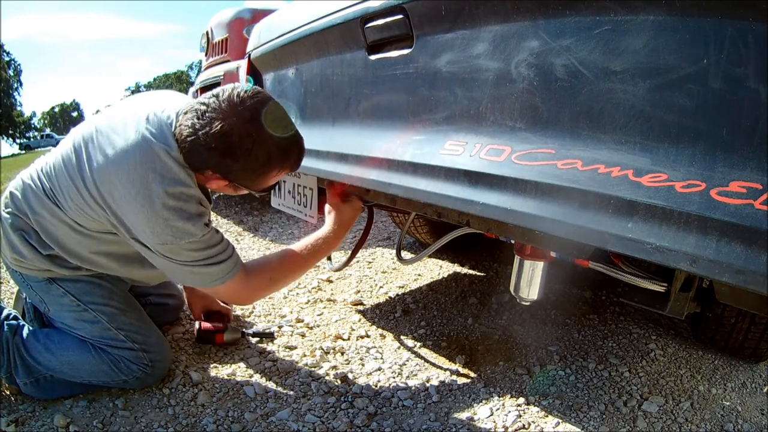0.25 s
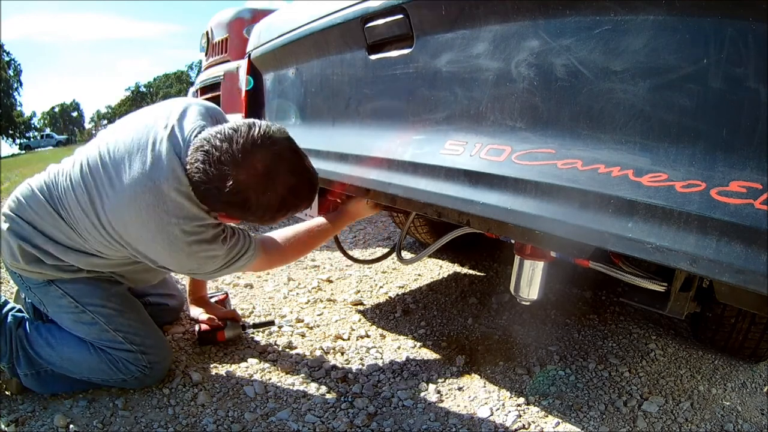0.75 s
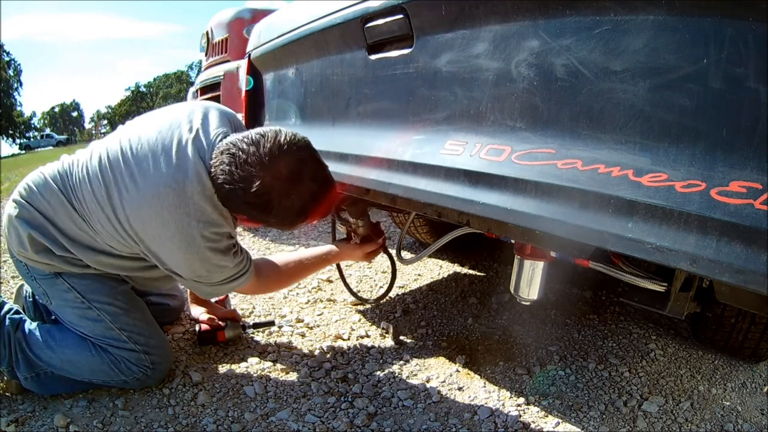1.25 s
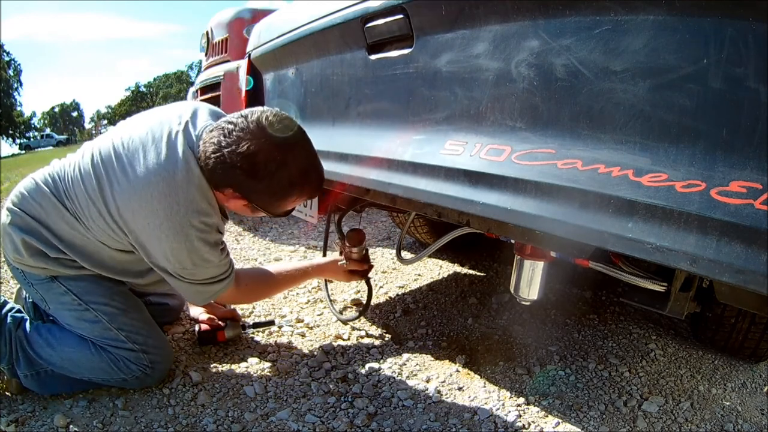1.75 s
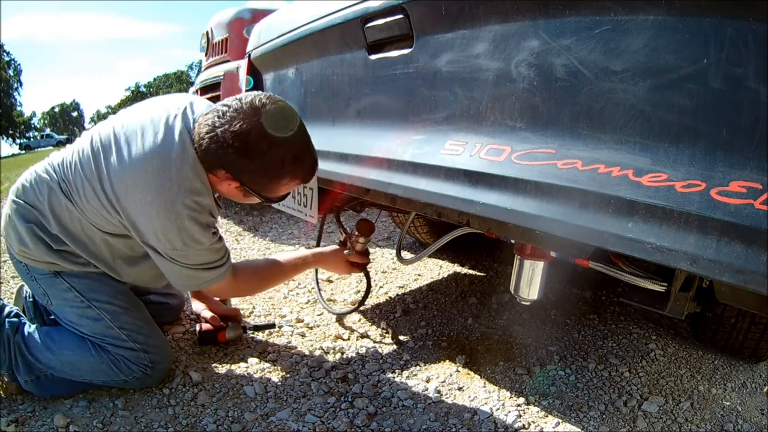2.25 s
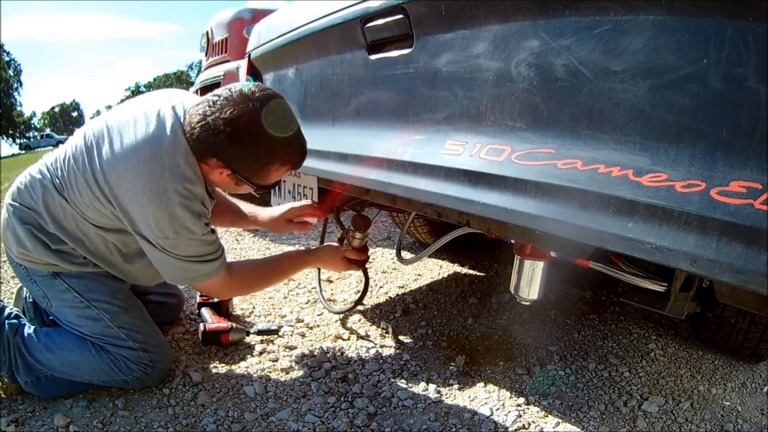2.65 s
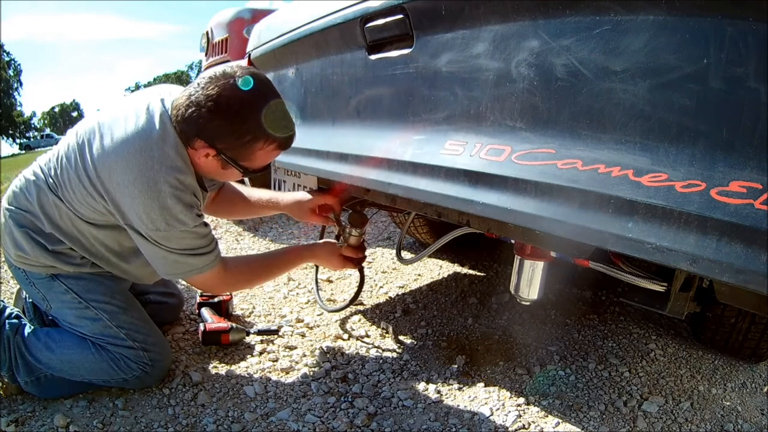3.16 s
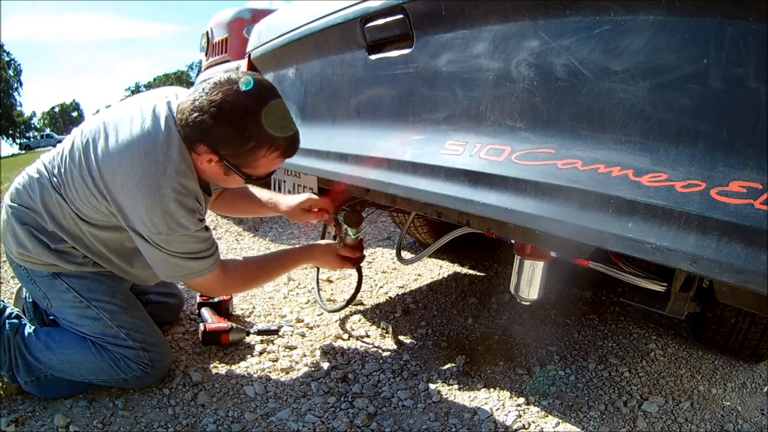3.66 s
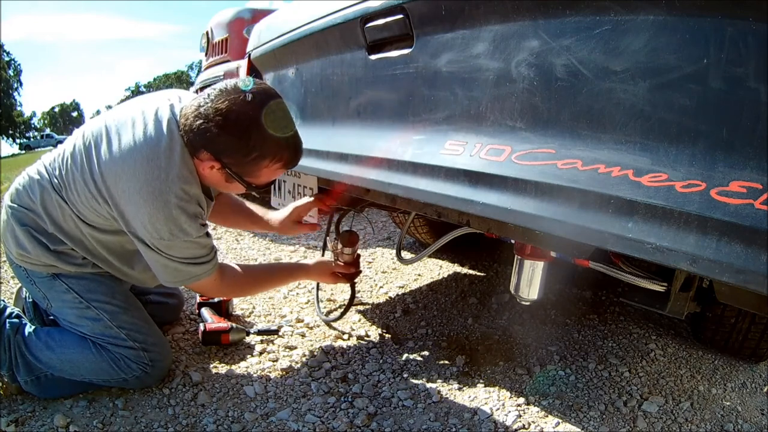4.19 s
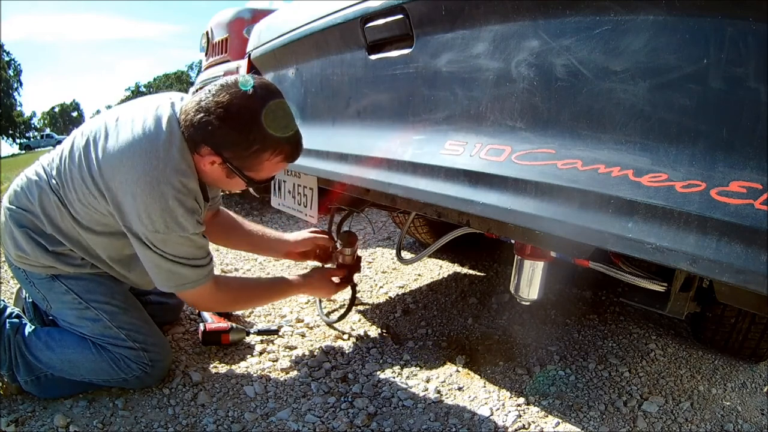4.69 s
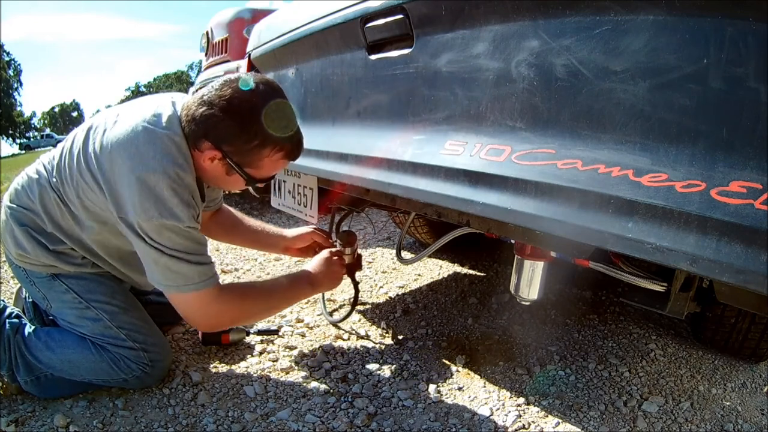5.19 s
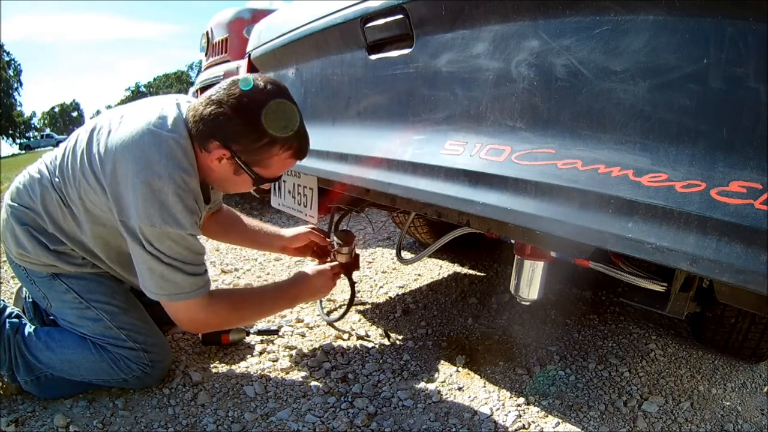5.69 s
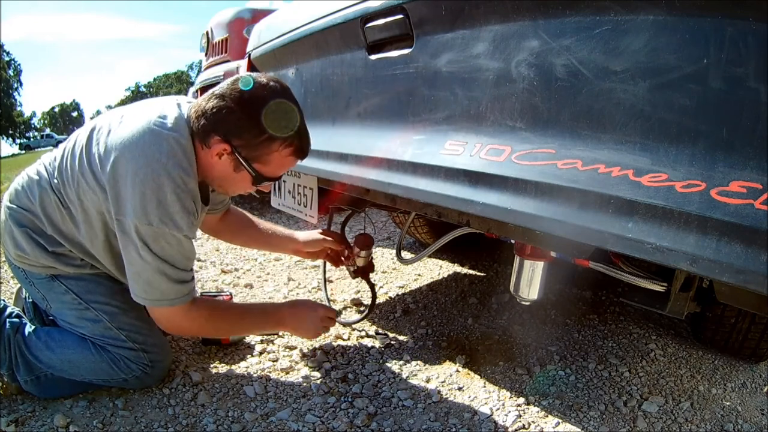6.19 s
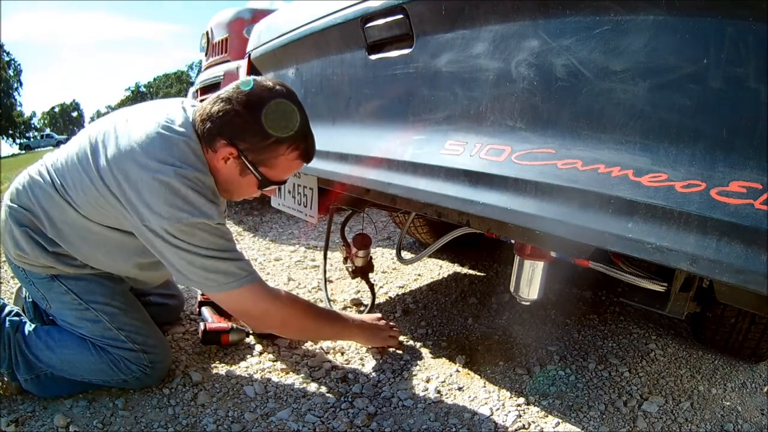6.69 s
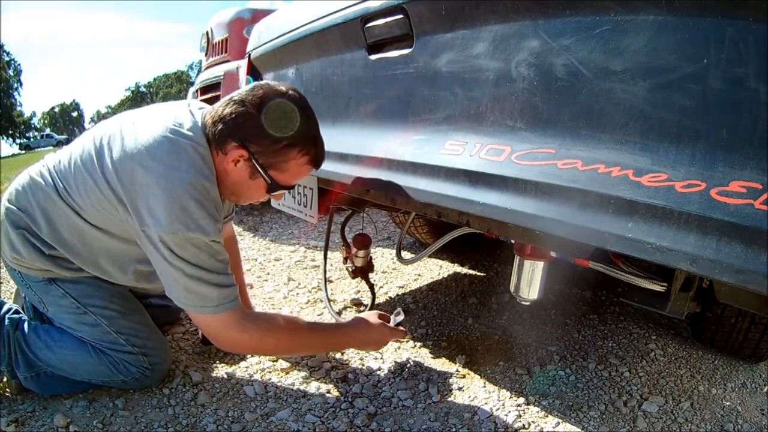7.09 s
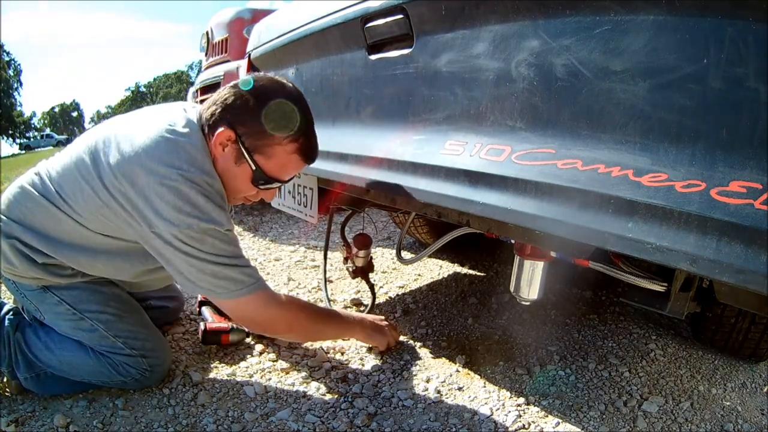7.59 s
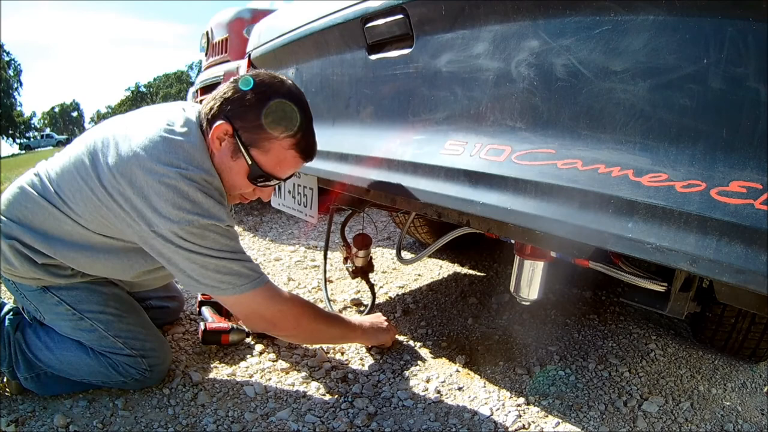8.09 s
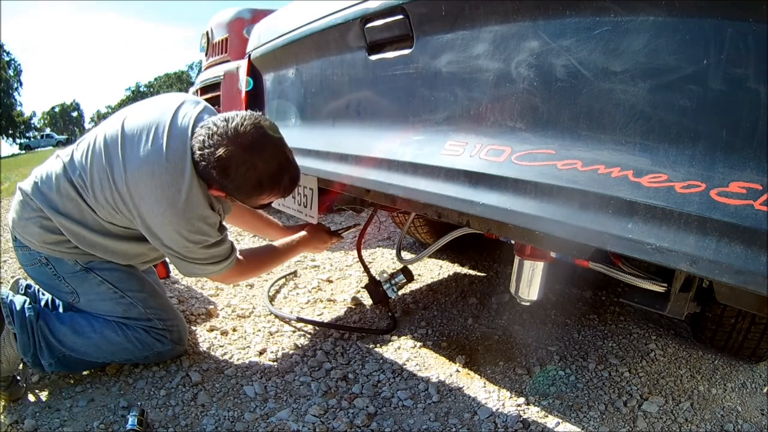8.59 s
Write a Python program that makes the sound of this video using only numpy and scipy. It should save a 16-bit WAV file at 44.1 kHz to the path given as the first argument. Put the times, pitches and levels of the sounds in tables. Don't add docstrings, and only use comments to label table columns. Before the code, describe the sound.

Outdoors by a parked vehicle on gravel, a fan-like machine hums steadily close by with rushing air. Within the first second small metal ticks and a scrape lead to a sharp ringing door slam some way off. Quiet humming follows with sparse tool ticks, then a few dull knocks and a heavy fluttering gust on the muffled microphone. The gust cuts off abruptly near the end, leaving the hum.

```python
import sys
import numpy as np
from scipy import signal
from scipy.fft import rfft, irfft, next_fast_len
from scipy.io import wavfile
from scipy.ndimage import map_coordinates

SR = 44100
rng = np.random.default_rng(int(sys.argv[2]) if len(sys.argv) > 2 else 0)


def invert_db(x):
    u = np.asarray(x, float) / 20
    return 10 ** u


def persist_wave(psi):
    counts = np.round(np.clip(psi, -1, 1) * 32767).astype(np.int16)
    wavfile.write(sys.argv[1], SR, np.atleast_2d(counts).T)


N = 390285


def unit(x):
    return x / np.sqrt(np.mean(x ** 2) + 1e-20)


def along(points, hz):
    f, v = np.transpose(points)
    return np.interp(np.log(hz + 1), np.log(f + 1), v)


def curves(rows):
    s, *columns = np.transpose(rows)
    return [np.interp(np.arange(N) / SR, s, column) for column in columns]


def wobble(rate):
    coarse = np.arange(0, N + 32, 32)
    knots = rng.standard_normal(int(N * rate / SR) + 4)
    return np.interp(np.arange(N), coarse, map_coordinates(knots, [coarse * rate / SR]))


def filtered(x, response):
    m = next_fast_len(len(x) + 8192)
    return irfft(rfft(x, m) * response(np.fft.rfftfreq(m, 1 / SR)), m)[:len(x)]


def noise(spectrum):
    low, high = spectrum[0][0] / 2, spectrum[-1][0] * 2
    ends = [(low, -120)] + list(spectrum) + [(high, -120)]
    return unit(filtered(rng.standard_normal(N), lambda hz: invert_db(along(ends, hz))))


def resonant(peaks):
    def body(f):
        total = 0
        for k, (hz, width, db) in enumerate(peaks):
            damping = 1j * f * width
            total = total + (-1) ** k * invert_db(db) * damping / (hz * hz - f * f + damping)
        return total / (1 + (f / (1.1 * peaks[-1][0])) ** 4)
    return unit(filtered(rng.standard_normal(N), body))


def add(track, s, sound):
    track[round(s * SR):][:len(sound)] += sound


def gate(start, end, rise, fall):
    risen = start + rise
    end = max(end, risen)
    return curves([(start, 0), (risen, 1), (end, 1), (end + fall, 0)])[0]


def stroke(s, length, db, rise, fall, sag_db):
    progress = np.clip((np.arange(N) / SR - s) / length, 0, 2)
    return gate(s, s + length, rise, fall) * invert_db(db - sag_db * progress)


def burst(s, db, hz, t60, octaves, attack_s):
    t = np.arange(SR // 8) / SR

    def band(width):
        bell = lambda f: np.exp(-(np.log2((f + 1) / hz) / width) ** 2 / 2)
        return unit(filtered(rng.standard_normal(len(t)), bell))
    puff = invert_db(-60 * t / t60) * band(octaves)
    snap = invert_db(-0.5 - 60 * t / 0.0066) * band(.55)
    return s, invert_db(db) * (1 - np.exp(-t / attack_s)) * (puff + snap)


# pitch_hz, level_db per Hz
HISS_COLOUR = [(3000, -4), (6500, -3), (7500, -5.5), (12000, -6.5), (13500, -4), (15600, -2)]


def microphone_hiss():
    return invert_db(-80) * noise(HISS_COLOUR)


# time_s, buffet_db
BREEZE_LEVEL = [(0, -62.5), (.2, -49.5), (1.1, -46), (1.85, -46), (2.05, -57.5), (2.3, -41), (3.1, -45.5),
                (3.5, -54), (3.95, -64), (5.75, -63), (6.0, -40.5), (6.6, -48), (6.8, -32), (8.17, -36),
                (8.2, -53.5), (8.85, -51)]
# peak_s, level_db, length_s
EDDY_PUFFS = [(0.17, -41.5, 0.053), (.62, -40, 0.063), (0.796, -34.5, 0.091), (1.21, -38.5, .08),
              (1.38, -44, 0.038), (1.47, -36.5, 0.033), (1.585, -37.5, .05), (1.742, -32.5, 0.12),
              (2.887, -36.5, 0.058), (3.059, -44.5, 0.071), (3.329, -44.5, 0.037), (3.493, -51.5, 0.073),
              (5.019, -53.5, .05), (5.997, -43, 0.045), (6.915, -35, 0.081), (7.003, -32.5, 0.055),
              (7.17, -31, .06), (7.275, -22, 0.045), (7.417, -29.5, 0.06), (7.677, -33, 0.085),
              (7.758, -30, 0.094), (7.85, -30.5, .06), (7.916, -39.5, 0.054), (8.115, -31, 0.083),
              (8.31, -42.5, .07), (8.48, -44.5, 0.11), (8.757, -43.5, 0.072)]
# pitch_hz, level_db per Hz
BUFFET_COLOUR = [(15, -1), (35, 2.5), (80, 2), (125, -9.5), (220, -19.5), (400, -56.5)]


def buffeting(eddies):
    time = np.arange(N) / SR
    level = invert_db(curves(BREEZE_LEVEL)[0] + 2 * wobble(12))
    for s, db, length in EDDY_PUFFS:
        level = level + invert_db(db) * np.exp(-((time - s) / (length / 2)) ** 2)
    return level * invert_db(-3.5 + 2.8 * eddies) * noise(BUFFET_COLOUR)


# time_s, speed_db as flutter level
GUST_SPEED = [
    (6.68, -54),
    (6.81, -36),
    (6.94, -33),
    (7.06, -26),
    (7.22, -32.5),
    (7.31, -28.5),
    (7.6, -35.5),
    (7.88, -34),
    (8.18, -34.5),
]
# pitch_hz, level_db per Hz
FLUTTER_COLOUR = [(60, -27), (130, 0.5), (250, -3), (380, -5.5), (600, -34.5)]
# pitch_hz, level_db per Hz
RASP_COLOUR = [(250, -17.5), (400, 7.5), (700, -4), (1100, -18), (1500, -30), (2200, -46)]


def gust(eddies):
    speed_db = curves(GUST_SPEED)[0]
    blowing = gate(GUST_SPEED[0][0], CUTS[1][0], .04, 0.00018)
    flutter = invert_db(speed_db - 2.5 + 2.2 * eddies + 2.77 * wobble(60)) * noise(FLUTTER_COLOUR)
    rasp_db = -32 + 1.74 * (speed_db + 26)
    rasp = invert_db(rasp_db + 2.9 * eddies + 4.0 * wobble(60)) * noise(RASP_COLOUR)
    return blowing * (flutter + rasp)


# peak_s, level_db, pitch_hz
PUSHES = [(.155, -38, 40), (.2, -32, 40), (1.492, -31, 70), (1.738, -29.5, 70), (3.062, -31, 60.3),
          (6.752, -19, 80), (6.893, -19, 130), (6.923, -21.5, 120), (6.985, -17.5, 150), (7.041, -21.5, 85),
          (7.067, -17, 170), (7.078, -15.5, 120), (7.178, -18, 90), (7.4, -20, 100), (7.53, -19.5, 150),
          (7.673, -18.5, 75), (7.82, -24, 110), (7.94, -25, 80), (8.035, -22, 150), (8.128, -24, 120)]
# peak_s, level_db, pitch_hz
SUCKS = [
    (3.829, -29.5, 68.5),
]


def wind_pops():
    out, t = np.zeros(N), np.arange(-SR // 20, SR // 20) / SR
    for rows, sign in (PUSHES, 1), (SUCKS, -1):
        for s, db, hz in rows:
            u = np.pi * hz * t
            add(out, s + t[0], sign * invert_db(db) * (1 - 2 * u ** 2) * np.exp(-u ** 2))
    return out


# start_s, peak_db, pitch_hz, t60_s, width_octaves
AIR_TEARS = [
    (6.96, -26, 550, 0.14, 0.45),
    (7.052, -27.5, 685, 0.16, 0.55),
    (7.16, -27.5, 600, 0.16, 0.6),
    (7.305, -27, 620, 0.11, 0.49),
    (7.52, -30, 400, 0.11, 0.42),
]


def wind_tears():
    out = np.zeros(N)
    for row in AIR_TEARS:
        add(out, *burst(*row, attack_s=.012))
    return out


def wind():
    eddies = 0.67 * wobble(30)
    air = buffeting(eddies) + gust(eddies)
    air = air + 2.1 * filtered(air ** 2, lambda hz: (hz > 15) * (hz < 500))
    return air + wind_pops() + wind_tears()


# start_s, peak_db, pitch_hz, t60_s, width_octaves
TOOL_TICKS = [(0.221, -61, 3000, 0.064, 0.35), (.606, -55, 3900, 0.019, 0.14),
              (.606, -58, 6500, 0.022, .15), (.782, -69, 6000, .08, .2), (.661, -59, 3900, 0.033, 0.34),
              (0.667, -55, 2980, 0.074, 0.22), (2.346, -57.5, 3800, 0.042, .15),
              (2.346, -68, 5600, .04, .2), (2.634, -71, 3000, .03, .4), (5.042, -68, 3000, .03, .4),
              (5.533, -61, 3100, .03, .15), (5.533, -62, 5800, .02, 0.27), (8.265, -68, 6200, .02, 0.16),
              (8.314, -69, 6300, 0.014, .2), (8.398, -71, 4500, .02, .5), (8.54, -75, 5500, .06, .3)]
# start_s, peak_db, pitch_hz, t60_s, width_octaves
TOOL_KNOCKS = [
    (0.22, -34.5, 990, 0.063, 0.62),
    (0.717, -32, 990, 0.098, 0.55),
    (6.0, -48, 1190, 0.36, 0.26),
    (6.04, -55, 1690, 0.063, 0.31),
    (6.1, -45.5, 1480, .1, 0.33),
    (6.209, -41, 1450, 0.065, 0.25),
    (8.4, -52, 900, 0.048, .5),
]


def contacts():
    out = np.zeros(N)
    for row in TOOL_TICKS + TOOL_KNOCKS:
        add(out, *burst(*row, attack_s=0.00063))
    return out


# start_s, length_s, level_db, pitch from 0 plate to 1 bolt
LATCH_STROKES = [
    (0.562, 0.21, -47, 0.41),
    (0.724, 0.022, -31, .1),
    (0.743, 0.024, -24.5, .05),
    (.768, 0.042, -30, .4),
    (0.815, .032, -28, 0.9),
    (0.846, 0.03, -34, 0.34),
]
# pitch_hz, width_hz, level_db
PLATE_PEAKS = [(415, 120, -5), (550, 180, -2), (790, 260, -2.5), (955, 110, 1), (1150, 100, -4),
               (1860, 600, -15.5)]
# pitch_hz, width_hz, level_db
BOLT_PEAKS = [(513, 360, -11), (1185, 86, -4.5), (1396, 51, -2), (2010, 300, -12.5)]
# pitch_hz, level_db per Hz
GRIT_COLOUR = [(1800, 9), (2400, -1.5), (3200, -6), (4000, -8), (4700, -24), (5400, -27), (7300, -33),
               (8000, -48.5)]


def latch_scrape():
    plate, bolt, grit = resonant(PLATE_PEAKS), resonant(BOLT_PEAKS), noise(GRIT_COLOUR)
    scrape = np.zeros(N)
    for s, length, db, high in LATCH_STROKES:
        rub = (1 - high) * plate + high * bolt + invert_db(-19 - 7 * high) * grit
        scrape += stroke(s, length, db, rise=0.0051, fall=0.0059, sag_db=-1.5) * rub
    return invert_db(1.8 * wobble(110)) * scrape


# start_s, length_s, level_db
SHUDDERS = [
    (0.577, 0.15, -37),
    (0.749, .07, -23.5),
    (0.854, 0.052, -29),
]
# pitch_hz, width_hz, level_db
BOOM_PEAKS = [(110, 68, -11), (186, 42, -1.5), (300, 21, 3), (400, 290, -12.5)]


def panel_boom():
    shaking = sum(stroke(*row, rise=0.009, fall=0.028, sag_db=4.5) for row in SHUDDERS)
    return shaking * resonant(BOOM_PEAKS)


# pitch_hz, level_db, t60_s
PANEL_MODES = [(196.7, -4.5, 0.58), (261.4, -0.5, 0.84), (434, -3, 0.46), (467, -11, 0.5),
               (660, -12.5, 0.28), (724, -15, 0.28), (777, -13.5, 0.23), (955, 3.5, 0.089),
               (1216, -6.5, 0.13), (1474, 1, 0.06), (1794, -24, .15)]


def panel_ring(t):
    ring = np.zeros(len(t))
    for hz, db, t60 in PANEL_MODES:
        drift = .7 * wobble(14)[:len(t)]
        onset = 1 - np.exp(-t * hz / 3)
        ring += invert_db(db - 60 * t / t60) * np.sin(2 * np.pi * hz * t + drift) * onset
    seal_s = .135
    return ring * invert_db(-220 * np.maximum(t - seal_s, 0))


# pitch_hz, level_db per Hz
CRASH_COLOUR = [(100, -9), (456, -10.5), (933, -4), (1330, -10.5), (1470, -9), (1850, -13), (2890, -28.5),
                (4200, -33.5), (5200, -52), (7300, -61), (8000, -87.5)]
# pitch_hz, t60_s
CRASH_DECAY = [(150, 1), (400, 0.75), (1000, 0.28), (2500, 0.19), (6000, 0.14)]


def slam_crash(t):
    hz, frames, z = signal.stft(noise(CRASH_COLOUR)[:len(t)], SR, nperseg=256)
    decay = invert_db(-60 * frames / along(CRASH_DECAY, hz)[:, None])
    crash = signal.istft(z * decay, SR, nperseg=256)[1][:len(t)]
    front = 1 + invert_db(-8 - 60 * t / .05)
    return crash * front * (1 - np.exp(-t / 0.00046))


def door():
    out = latch_scrape() + panel_boom()
    t = np.arange(SR // 2) / SR
    slam_s, slam_db = .8745, -14.5
    add(out, slam_s, invert_db(slam_db) * (0.83 * panel_ring(t) + 0.59 * slam_crash(t)))
    return out


# time_s, speed in turns per s
SHAFT_SPEED = [(0, 43.0), (1, 42.99), (1.3, 42.82), (1.9, 42.84), (2.2, 42.92), (4.4, 42.9), (4.7, 42.97),
               (5.8, 42.93), (6.2, 43.0), (8.4, 42.95), (8.6, 42.65), (8.85, 42.7)]


def shaft_angle():
    angle = 2 * np.pi * np.cumsum(curves(SHAFT_SPEED)[0]) / SR
    for s, _, jump in CUTS:
        angle = angle + jump * (np.arange(N) > s * SR)
    return angle


# multiple of shaft speed, level_db, swim_db, share of shading 0-1
BLADE_ORDERS = [(3, -45.5, 0.97, 0), (6, -55.5, 2, 0), (9, -46.5, 1.5, 0), (11.85, -58, 2.5, 0.3),
                (15, -54, 0, 0.2), (17.76, -61, 2.5, 0.3), (20, -57.5, 2.5, 0), (21, -60.5, 1.9, 0.03),
                (23.8, -72, 4, 0.3), (27, -64.5, 4, 0.7), (30, -71.5, 4, 0.4), (36, -58.5, 0.6, 0.74)]


def blade_tones(angle, shade_db):
    tones = np.zeros(N)
    for order, db, swim_db, share in BLADE_ORDERS:
        swim = swim_db * (0.89 * wobble(2.59) + wobble(9))
        phase = round(order) * angle + 0.015 * order * wobble(7) + rng.uniform(-.6, 0.67)
        tones += np.sqrt(2) * invert_db(db + share * shade_db + swim) * np.cos(phase)
    return tones


# pitch_hz, level_db per Hz
HOUSING_COLOUR = [(30, -10), (74, -14), (160, -11), (195, -5.5), (320, -4), (506, -8.5), (790, -12),
                  (830, -14), (1050, -13), (1600, -18.5), (1800, -22), (3060, -45), (4200, -48),
                  (6700, -64)]
# pitch_hz, width_hz, level_db
GUARD_LIFTS = [(600, 14, -3), (790, 13, -6), (1136, 120, 1.5), (1763, 40, -4.5), (2584, 60, 6),
               (2630, 50, -5.5), (3230, 310, 5), (3970, 290, 1)]


def housing_rush(angle, shade_db):
    def guard(f):
        return invert_db(sum(db * np.exp(-((f - hz) / width) ** 2) for hz, width, db in GUARD_LIFTS))
    rush = filtered(noise(HOUSING_COLOUR), guard) * invert_db(.4 * wobble(4))
    chop = 1 + 0.028 * np.cos(3 * angle)
    return invert_db(-43.5 + 0.08 * shade_db) * chop * rush


# time_s, level_db
BODY_SHADE = [(0, 0), (1, 0), (1.9, -2), (2.4, 2), (3.4, -2), (4, -1), (4.5, -2), (4.8, 2), (5.4, -3),
              (6.2, 2), (6.7, -3), (8.1, -4), (8.25, 2), (8.5, 6), (8.85, 7)]


def fan():
    angle, shade_db = shaft_angle(), curves(BODY_SHADE)[0]
    return blade_tones(angle, shade_db) + housing_rush(angle, shade_db)


# start_s, click_db, shaft jump_rad
CUTS = [
    (0.5695, -45, 1.9),
    (8.1801, -35, 2.6),
]


def cut_clicks():
    out, t = np.zeros(N), np.arange(400) / SR
    for s, db, _ in CUTS:
        add(out, s, invert_db(db) * np.exp(-t / 0.0003))
    return out


def scene():
    return (wind() + contacts() + door() + fan())[None]


def roll_off(x):
    return signal.sosfilt(signal.butter(12, 15790, fs=SR, output="sos"), x)


def record(dry):
    ceiling, knee = .4, 4
    squeezed = dry[0] / (1 + np.abs(dry[0] / ceiling) ** knee) ** (1 / knee)
    mix = squeezed + microphone_hiss() + cut_clicks()
    return roll_off(mix[None])


dry = scene()
out = record(dry)
persist_wave(out)
```